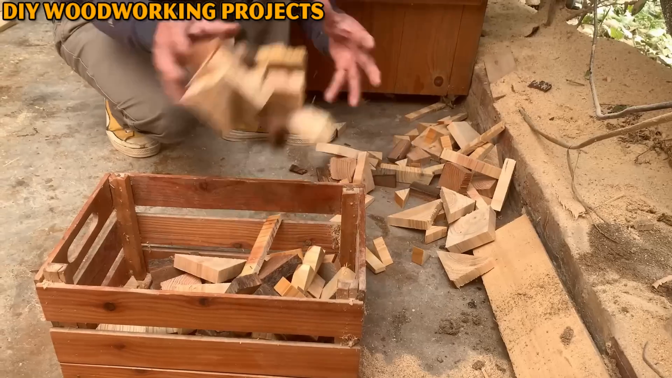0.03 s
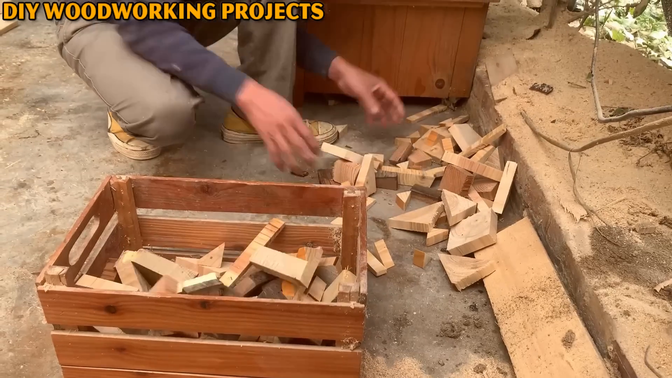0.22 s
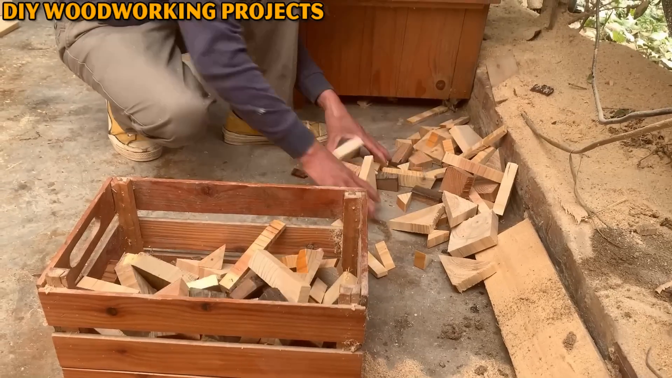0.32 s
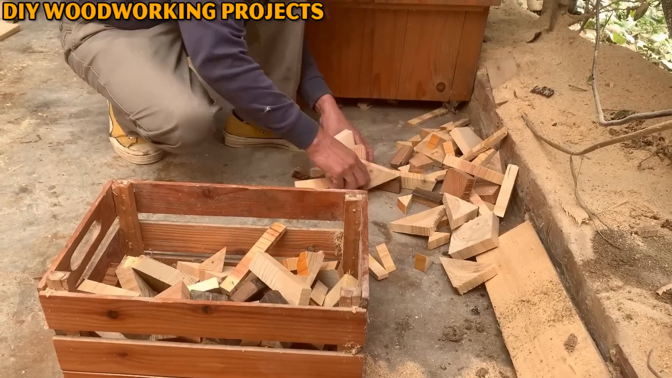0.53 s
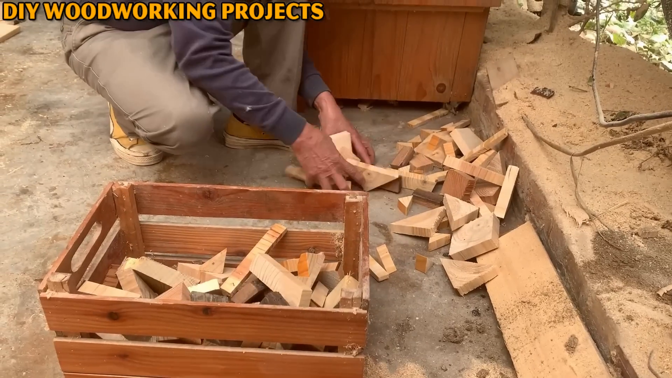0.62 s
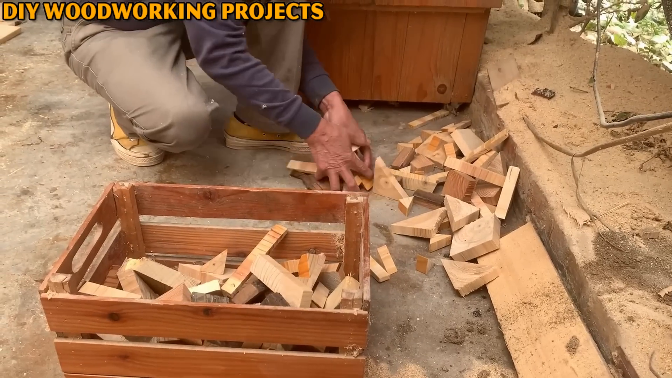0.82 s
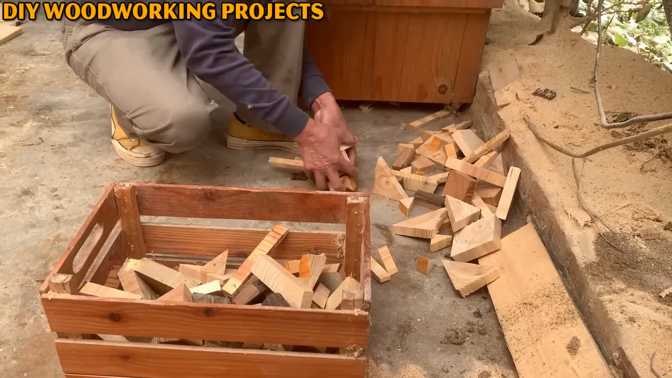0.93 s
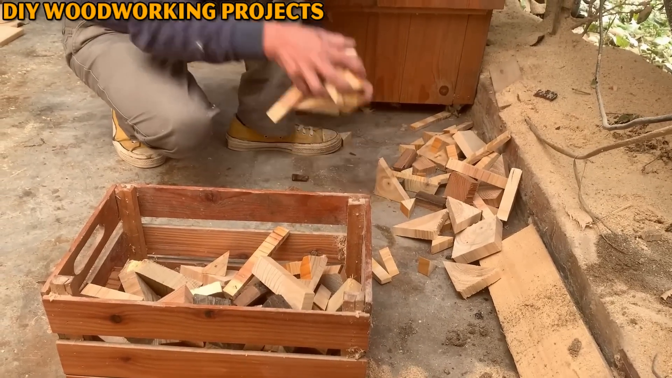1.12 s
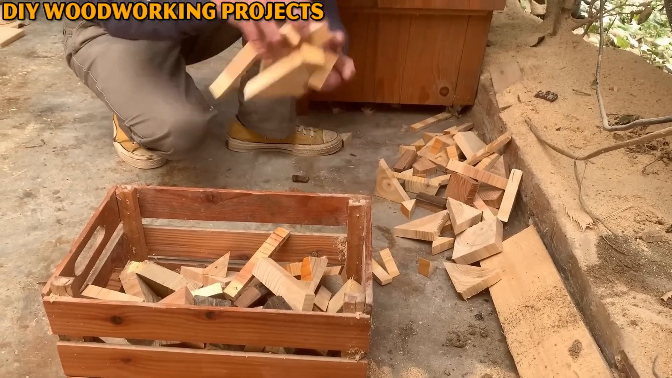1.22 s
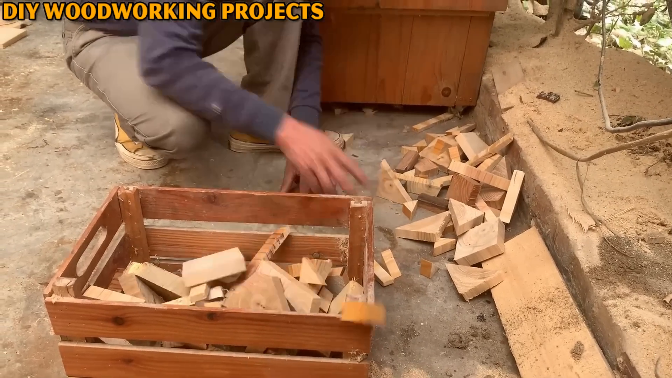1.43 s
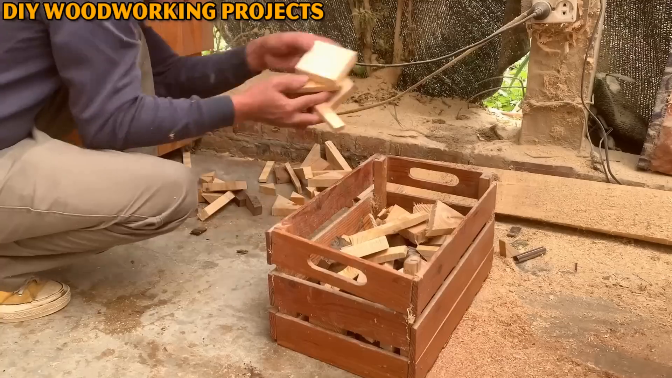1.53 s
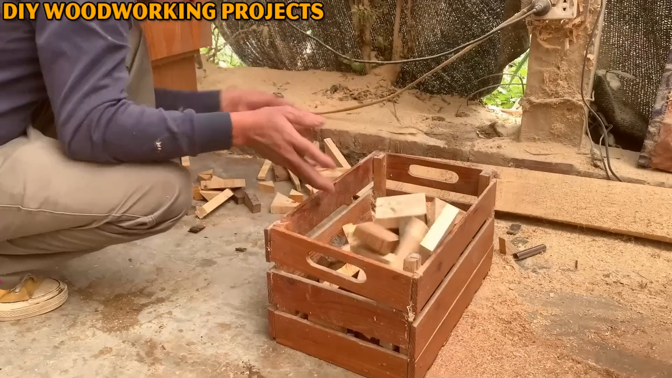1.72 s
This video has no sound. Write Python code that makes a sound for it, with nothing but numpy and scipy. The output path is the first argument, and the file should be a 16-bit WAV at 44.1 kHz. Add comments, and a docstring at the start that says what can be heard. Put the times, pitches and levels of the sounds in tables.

```python
"""Two handfuls of small wooden offcuts clatter into a slatted crate in a half-open workshop.
Each landing is a noise crack with rebounds, ringing block and crate modes; loose blocks click, damped by
the hands, and bump the floor. Between throws blocks scrape on concrete as enveloped grit ticks, with a low
noise shuffle of sleeves and hands. Nearby boards and a short tail scatter it all over faint workshop air;
the level dips briefly after the second throw."""
import sys
import numpy as np
from scipy import signal
from scipy.fft import rfft, irfft
from scipy.io import wavfile

SR = 44100
rng = np.random.default_rng(int(sys.argv[2]) if len(sys.argv) > 2 else 0)


def bounce(signal):
    """Save signal as a 16-bit WAV file at the path given by the first command-line argument."""
    frames = np.transpose(np.atleast_2d(signal))
    limited = np.clip(frames, -1, 1)
    pcm = np.round(limited * 32767).astype(np.int16)
    wavfile.write(sys.argv[1], SR, pcm)


N = 77175
T = np.arange(N) / SR
LEAD_S = 0.02  # room ahead of each contact
RING_T = T[:SR // 4] - LEAD_S  # seconds from contact
TOP_HZ = 15600

# Modes of a wooden block. Each row: multiple of its pitch, relative level in dB, undamped t60 in seconds.
BLOCK_MODES = [(1, -2, 0.037), (1.17, -11, 0.048), (1.55, -9.5, 0.028), (2.15, -7, 0.0083),
               (2.8, -18.5, .02)]


def undb(db):
    """Decibels to gain."""
    return 10 ** (np.asarray(db) / 20)


def unit(x):
    """Scale to rms 1."""
    return x / np.sqrt(np.mean(x ** 2))


def on_log(hz, points):
    """Read (Hz, value) points on a log-frequency axis."""
    f, v = np.array(points, float).T
    return np.interp(np.log(np.maximum(hz, 1)), np.log(f), v)


def colour(x, points):
    """Shape a signal by relative (Hz, dB) points; white noise keeps its power."""
    size = x.shape[-1]
    hz = np.fft.rfftfreq(size, 1 / SR)
    gain = unit(undb(on_log(hz, points)))
    return irfft(rfft(x) * gain, size)


def uneven(x, depth_db):
    """Scatter resonance peaks and gaps over a sound, partly different in each channel."""
    spacing_hz = 167.4
    hz = np.fft.rfftfreq(x.shape[-1], 1 / SR)
    shared, left, right = rng.standard_normal((3, 512))
    shapes = []
    for own in (left, right):
        points = np.clip(0.8 * shared + 0.6 * own, -2, 1.5)
        shapes.append(np.interp(hz / spacing_hz, np.arange(512), points))
    return irfft(rfft(x) * unit(undb(depth_db * np.array(shapes))), x.shape[-1])


def follow(points):
    """Gain over time from (seconds, dB) points."""
    return undb(np.interp(T, *np.array(points).T))


def catches():
    """Quick uneven swings of level as wood catches and slips."""
    rate_hz, depth_db = 45, 2.06
    swings = np.clip(rng.standard_normal(512), -2, 1.5)
    return undb(depth_db * np.interp(T * rate_hz, np.arange(512), swings))


def scrape():
    """Blocks dragged over gritty concrete: grit catches under them in many tiny decaying ticks."""
    grit_per_s, spread_db, fall_s, shape_db = 3500, 6, 0.0018, 2
    # Each row: time in seconds, level in dB before the catches.
    drag_levels = [(0, -80.5), (.11, -75), (.17, -74.5), (.40, -76), (.47, -65), (.51, -55.5), (.565, -53),
                   (.595, -60), (.70, -67), (.77, -64), (.81, -54.5), (.83, -61), (.92, -74), (.97, -52),
                   (1.02, -63), (1.11, -88.5), (1.16, -85), (1.20, -71.5), (1.30, -71), (1.36, -83.5),
                   (1.41, -48.5), (1.59, -58.5), (1.75, -66)]
    # Scrape spectrum. Each row: frequency in Hz, relative level in dB per Hz.
    drag_colour = [(40, -13), (200, -6), (450, -8.5), (950, -10.5), (1900, -15), (3100, -14), (4000, -19.5),
                   (5200, -17), (8000, -25.5), (10000, -24.5), (15000, -34)]
    hits = rng.random(N) < grit_per_s / SR
    ticks = hits * undb(spread_db * np.clip(rng.standard_normal(N), -2, 2))
    grip = signal.lfilter([1], [1, -np.exp(-1 / (fall_s * SR))], ticks)
    rub = uneven(colour(grip * rng.standard_normal((2, N)), drag_colour), shape_db)
    return unit(rub) * catches() * follow(drag_levels)


def shuffle():
    """Sleeves and hands shuffling low over the floor: soft, low-coloured noise."""
    # Each row: time in seconds, level in dB.
    rub_levels = [(0, -66), (.16, -76.5), (.30, -66), (.44, -72), (.56, -62), (.66, -65.5), (.76, -56),
                  (.84, -60.5), (.92, -68), (1.12, -80.5), (1.28, -84), (1.38, -65), (1.52, -67.5),
                  (1.60, -90), (1.75, -97)]
    # Shuffle spectrum. Each row: frequency in Hz, relative level in dB per Hz.
    rub_colour = [(40, -16.5), (100, -1), (160, 0.5), (380, -5), (600, -16), (2000, -34), (15000, -61)]
    return unit(colour(rng.standard_normal((2, N)), rub_colour)) * follow(rub_levels)


def air():
    """Quiet workshop air: wide, faint noise, a little to the right."""
    level_db, side_gain, pan_db = -71, 0.84, -5.5  # pan: left minus right
    # Air spectrum. Each row: frequency in Hz, relative level in dB per Hz.
    air_colour = [(25, -7), (70, 1), (130, -3.5), (220, -18), (450, -27.5), (1000, -32), (2200, -31.5),
                  (5000, -42), (15000, -42.5)]
    mid, side = colour(rng.standard_normal((2, N)), air_colour)
    signs = np.array([[1], [-1]])
    return unit(mid + side_gain * side * signs) * undb(level_db + pan_db * signs / 2)


def lowpass(x, hz):
    """A softer contact has less treble."""
    return signal.lfilter(*signal.butter(3, min(hz, SR * 0.45), fs=SR), x)


def swell(rise_s):
    """Rise from 0 towards 1 from the moment of contact."""
    return 1 - np.exp(-(np.maximum(RING_T, 0) / rise_s) ** 2)


def burst(rise_s, fall_s, lead_db):
    """Envelope: a soft short lead-in before contact, then a quick swell and exponential fall."""
    lead_fall_s = 0.0034
    env = swell(rise_s) * np.exp(-abs(RING_T) / fall_s)
    lead = undb(lead_db) * np.exp(-abs(RING_T) / lead_fall_s)
    return np.maximum(env / env.max(), lead)


def crack(points, rise_s, fall_s, lead_db):
    """Dense, quickly damped ringing of rough wood at contact: unevenly coloured noise."""
    shape_db = 5
    noise = colour(rng.standard_normal((2, len(RING_T))), points)
    return uneven(noise * burst(rise_s, fall_s, lead_db), shape_db)


def ring(modes, scale, rise_s):
    """Decaying sine modes, slightly detuned at each blow, with different phases left and right."""
    phase_spread_rad, detune = 1.54, 0.0054
    out = 0
    for hz, db, t60_s in modes:
        offset = np.array([[0], [phase_spread_rad * rng.choice([-1, 1])]])
        phase = 2 * np.pi * rng.random() + offset
        f = min(hz * scale * (1 + detune * rng.standard_normal()), TOP_HZ)
        decay = np.exp(-np.log(1000) * abs(RING_T) / t60_s)
        out = out + undb(db) * decay * np.sin(2 * np.pi * f * RING_T + phase)
    return out * swell(rise_s)


def add(out, at_s, sound, db, pan_db=0):
    """Mix a stereo sound in at a contact time, level and left-minus-right balance."""
    i = max(int((at_s - LEAD_S) * SR), 0)
    part = sound[:, :max(N - i, 0)]
    out[:, i:i + part.shape[1]] += part * undb(db + np.array([[pan_db], [-pan_db]]) / 2)


def clacks():
    """Loose blocks knock together, their ring cut short by the hands."""
    rise_s, fall_s, lead_db = 0.00046, 0.0025, -13
    hand_damping_s, ring_db = 0.0031, 4
    # Each row: contact in seconds, level in dB, block pitch in Hz, block ring in dB (unused),
    # contact cut-off in Hz, left minus right in dB.
    knocks = [(.031, -55, 1200, 8, 2940, 2.5), (0.139, -69, 2780, 14, 5000, -2),
              (0.4498, -33.5, 1062, 1, 2830, 3.5), (0.478, -52, 3350, 14, 6100, -1),
              (.504, -49.5, 1112, 8, 6050, 3), (0.548, -47, 960, 17, 5000, 8),
              (.618, -47, 1040, -17, 3280, -2), (0.7307, -43.5, 884, 6, 2140, -0.5),
              (.781, -57, 1150, 7, 4900, 15.5), (0.805, -48.5, 2300, 12, 4800, 1),
              (.8430, -35, 2024, -0.5, 3950, 2.5), (0.967, -45, 1126, -4, 11070, 4.5),
              (.9750, -35, 1810, -3, 12300, 5), (0.9909, -39, 825, -3, 2550, 3.5),
              (1.018, -31.5, 3045, -1, 8800, 2), (1.603, -39.5, 7020, 4, 8440, -4),
              (1.659, -41, 980, 3, 6200, -1), (1.6731, -43, 1026, -20.5, 7200, -4),
              (1.706, -42, 3960, 8.5, 11900, -4), (1.718, -47, 4250, 19, 10300, -2),
              (1.746, -55, 3600, -6, 6140, 12)]
    # Crack spectrum. Each row: frequency in Hz, relative level in dB per Hz.
    knock_colour = [(40, -12.5), (150, -5.5), (450, -3), (900, 4), (1900, -2), (3100, 2), (4600, -7),
                    (6500, -5.5), (15000, -13)]
    out = np.zeros((2, N))
    for at_s, db, hz, _, cut_hz, pan_db in knocks:
        held = ring(BLOCK_MODES, hz, rise_s) * np.exp(-abs(RING_T) / hand_damping_s)
        wood = crack(knock_colour, rise_s, fall_s, lead_db) + undb(ring_db) * held
        add(out, at_s, lowpass(wood, cut_hz), db, pan_db)
    return out


def rebounds():
    """Impulse train of a blow and a dying scatter of small rebounds among blocks already in the crate."""
    rate_per_s, level_db, fall_s = 230, -19.5, 0.018
    t = T[:SR // 8]
    hits = (rng.random(len(t)) < rate_per_s / SR) * rng.choice([-1, 1], len(t))
    train = hits * undb(level_db) * np.exp(-t / fall_s)
    train[0] = 1
    return train[None]


def landings():
    """Each landing cracks and rebounds, rings the block and sets the hollow crate going."""
    rise_s, fall_s, lead_db = 0.00086, 0.0043, -10
    block_base_db, crate_base_db, crate_scale = -2, -17.5, 0.96
    tick_db, hard_hz = -19.5, 4960  # contacts with at least this cut-off give the full tick
    second_throw_s = 1
    # Each row: contact in seconds, level in dB, block pitch in Hz, block ring in dB re block_base_db,
    # crate ring in dB re crate_base_db, contact cut-off in Hz, left minus right in dB.
    blows = [(0.196, -33.5, 1500, -6, -6.5, 4480, -2.5), (0.2019, -30.5, 1980, -23, 4, 4640, 11),
             (0.2057, -25.5, 2980, -11, 3.5, 7500, -4.5), (0.2173, -20.5, 1900, 4.5, -7, 6140, 1),
             (0.2208, -18, 2522, 9, -2, 6540, -0.5), (.2270, -21, 1475, 4, 0.5, 6000, 1),
             (.2425, -22, 2280, -22, 1, 6750, -1.5), (.2570, -24, 1845, 0.5, -15, 7200, 2),
             (.2600, -21.5, 847, 4, 4, 3970, 1.5), (0.2666, -20, 3163, 3.5, -2.5, 5560, 1),
             (.2970, -45.5, 1100, -6, 12, 3900, -13), (.3780, -43.5, 936, 3, 5, 1414, -1),
             (.4060, -51, 1010, -12, -12, 1500, -7), (1.4111, -23, 616, 0.5, 0, 2480, -6.5),
             (1.4140, -16, 1380, 3, -2, 3500, -3), (1.4224, -31, 2000, -3, -8, 3000, -3),
             (1.4306, -26, 2096, -2, -4, 3030, 5), (1.4392, -25.5, 2134, 5, 4, 8600, 1),
             (1.4501, -28, 1580, -9, 0.5, 5200, 10), (1.4615, -28.5, 950, -1, -2, 2660, -1.5),
             (1.4666, -27, 3557, -2, 12, 8500, -1.5), (1.4957, -29.5, 1130, 3.5, 6, 6940, 3.5),
             (1.5120, -36, 2182, -1, 4, 6000, 0), (1.536, -51.5, 724, 4, 9, 3880, 19),
             (1.5490, -52.5, 2110, 8, 0, 3800, -9), (1.5810, -41.5, 1633, 8, -1, 4200, 3.5),
             (1.5900, -45, 2500, 5.5, -6, 4180, -5.5)]
    # Crate modes. Each row: frequency in Hz before crate_scale, relative level in dB, t60 in seconds.
    crate_modes = [(150, -7.5, 0.11), (476, -3, 0.02), (657, -5.5, 0.049), (788, -4, .08), (882, -5.5, .08),
                   (917, -2, .08), (1065, -2.5, 0.061), (1234, -3, .08), (1422, -0.5, 0.025),
                   (1868, -4.5, .08), (2046, -2, .09), (2198, -1.5, .1), (5830, -11, .08)]
    # Crack spectra of the two handfuls. Each row: frequency in Hz, relative level in dB per Hz.
    first_colour = [(40, -20), (120, -12.5), (240, -5), (480, -1), (850, 0), (1500, 0.5), (2600, 0.5),
                    (5500, -5.5), (8000, -13), (10500, -12), (15000, -20)]
    second_colour = [(40, -17.5), (120, -4), (280, -10.5), (650, -0.5), (1300, -3.5), (2100, 0.5),
                     (2600, -4.5), (4000, -7), (6500, -14.5), (10000, -17), (15000, -7)]
    # Bright tick of a hard edge. Each row: frequency in Hz, relative level in dB per Hz.
    tick_colour = [(100, -30), (2000, -11.5), (5000, 2), (8000, -2.5), (12500, -6.5), (15000, -15.5)]
    out = np.zeros((2, N))
    for at_s, db, hz, block_db, crate_db, cut_hz, pan_db in blows:
        points = first_colour if at_s < second_throw_s else second_colour
        wood = crack(points, rise_s, fall_s, lead_db)
        wood = wood + undb(block_base_db + block_db) * ring(BLOCK_MODES, hz, rise_s)
        wood = wood + undb(crate_base_db + crate_db) * ring(crate_modes, crate_scale, rise_s)
        tick_gain = undb(tick_db) * min(cut_hz / hard_hz, 1)
        tick = tick_gain * crack(tick_colour, rise_s, fall_s, lead_db)
        blow = lowpass(wood, cut_hz) + tick
        add(out, at_s, signal.fftconvolve(blow, rebounds(), axes=1), db, pan_db)
    return out


def thuds():
    """Blocks and hands touch the floor softly: only a low, heavily damped bump."""
    # Each row: contact in seconds, level in dB, pitch in Hz.
    bumps = [(.550, -54, 215), (0.73, -43, 162), (0.747, -49.5, 213), (0.8337, -37.5, 164.7),
             (0.869, -52.5, 152)]
    # Bump modes. Each row: multiple of the pitch, relative level in dB, t60 in seconds.
    bump_modes = [(1, 3.5, .045), (1.45, 2, 0.039), (2.3, -1.5, 0.027)]
    out = np.zeros((2, N))
    for at_s, db, hz in bumps:
        add(out, at_s, ring(bump_modes, hz, rise_s=0.002), db)
    return out


def workshop(dry):
    """Quick scatter from nearby boards, then a short tail whose bass lasts longest."""
    near_db, near_t60_s, near_delay_s = -9, 0.095, 0.002
    tail_db, tail_build_s = -14.5, 0.004
    # Workshop decay. Each row: frequency in Hz, t60 in seconds.
    decay_t60 = [(100, 0.9), (700, 0.24), (2500, 0.23), (6000, 0.27), (14000, 0.22)]
    t = T[:SR // 2]
    near, late = rng.standard_normal((2, 2, len(t)))
    near = near * np.exp(-np.log(1000) * t / near_t60_s) * (t > near_delay_s)
    octaves = np.log2(np.fft.rfftfreq(len(t), 1 / SR) + 1)
    tail = 0
    for octave in range(5, 15):  # overlapping bands centred on 2 ** octave Hz
        band = irfft(rfft(late) * np.maximum(1 - abs(octaves - octave), 0), len(t))
        tail = tail + band * np.exp(-np.log(1000) * t / on_log(2.0 ** octave, decay_t60))
    tail = tail * (1 - np.exp(-t / tail_build_s))
    response = (undb(near_db) * unit(near) + undb(tail_db) * unit(tail)) / np.sqrt(len(t))
    return dry + signal.fftconvolve(dry, response, axes=1)[:, :N]


def scene():
    """All the wood and hands in the workshop, over its quiet air."""
    return workshop(landings() + clacks() + thuds() + scrape() + shuffle()) + air()


def record(dry):
    """The level dips briefly after the second throw; the top is cut."""
    start_s, end_s, fade_s, return_s, depth_db = 1.563, 1.579, 0.008, 0.00046, -23.5
    times_s = [start_s - fade_s, start_s, end_s, end_s + return_s]
    dip_db = np.interp(T, times_s, [0, depth_db, depth_db, 0])
    top_cut = signal.ellip(8, 0.2, 70, TOP_HZ, fs=SR, output="sos")
    return signal.sosfilt(top_cut, dry * undb(dip_db))


dry = scene()
out = record(dry)
bounce(out)
```